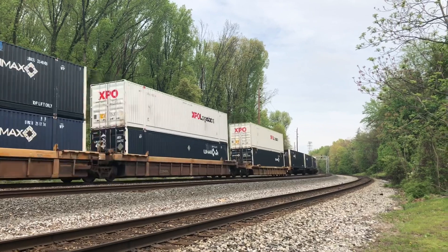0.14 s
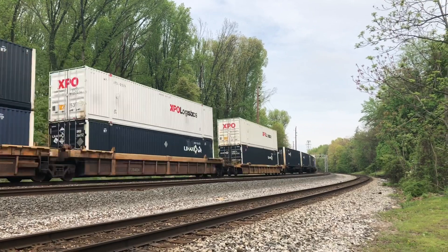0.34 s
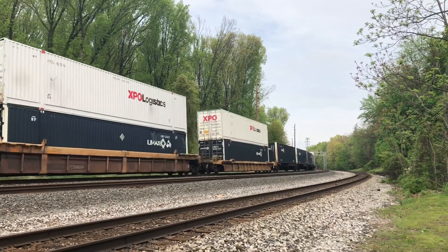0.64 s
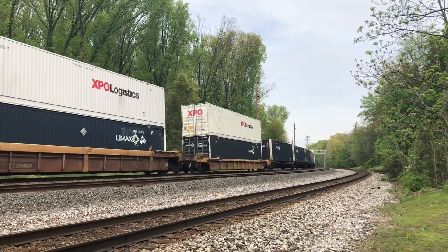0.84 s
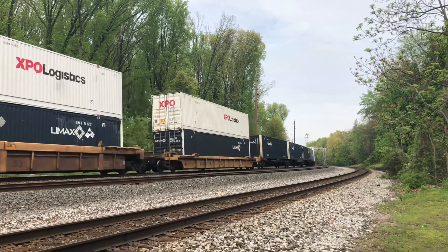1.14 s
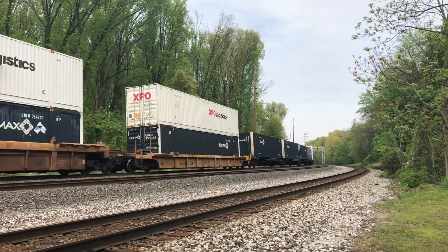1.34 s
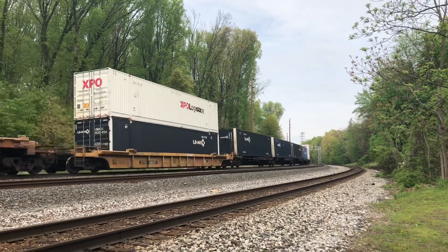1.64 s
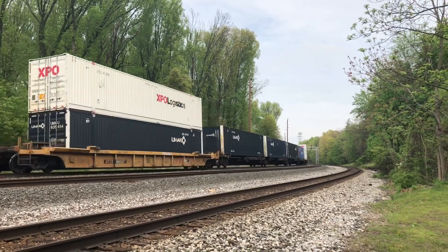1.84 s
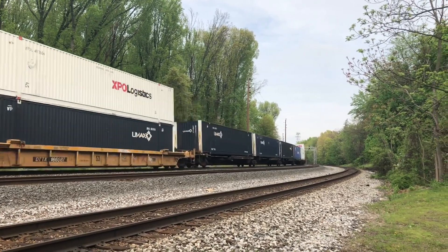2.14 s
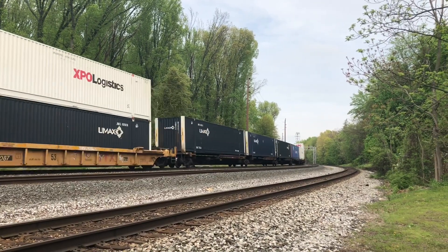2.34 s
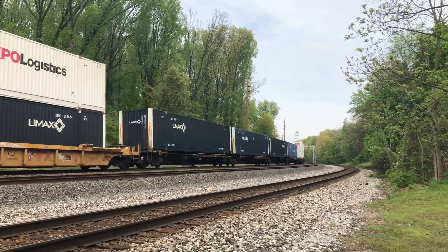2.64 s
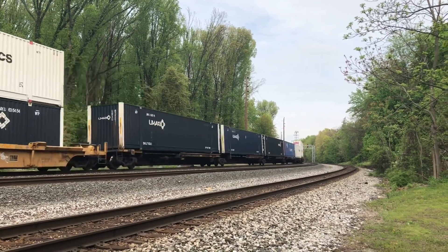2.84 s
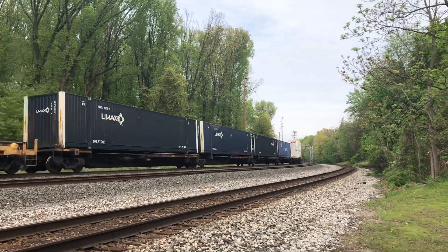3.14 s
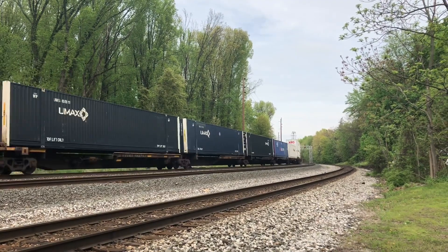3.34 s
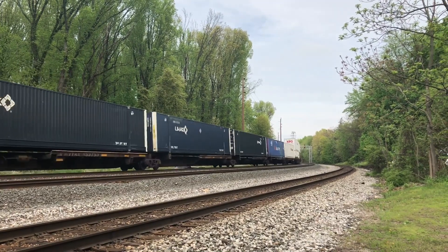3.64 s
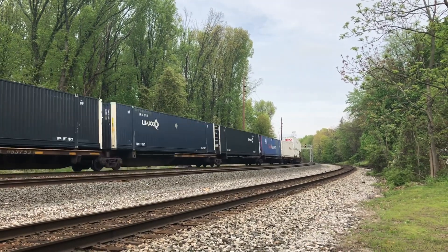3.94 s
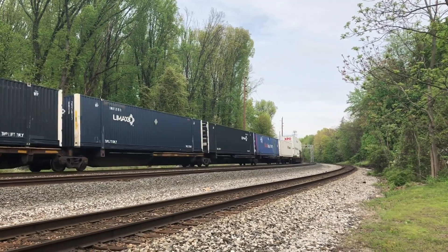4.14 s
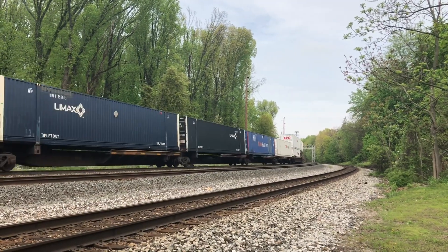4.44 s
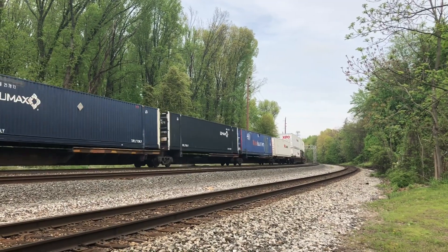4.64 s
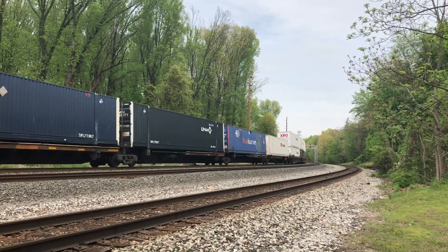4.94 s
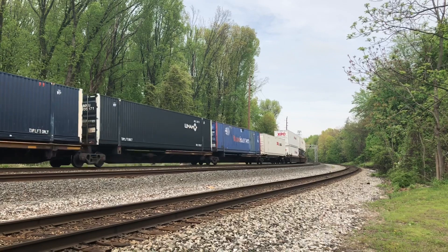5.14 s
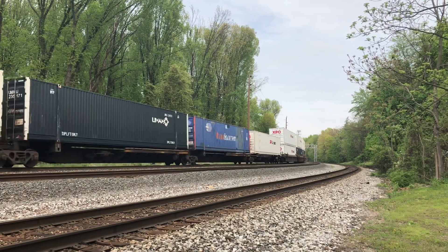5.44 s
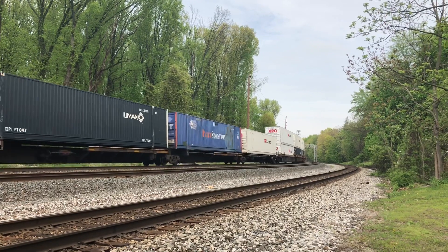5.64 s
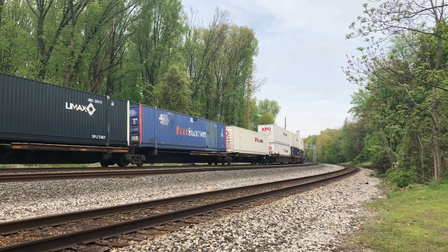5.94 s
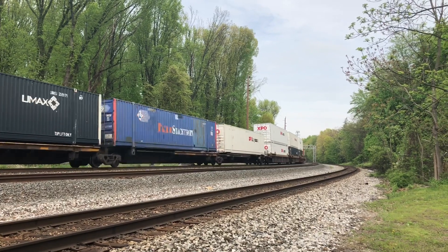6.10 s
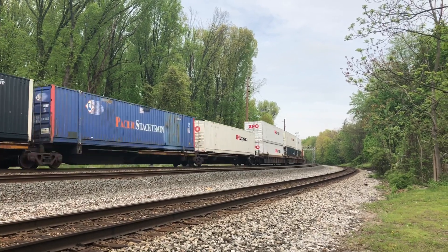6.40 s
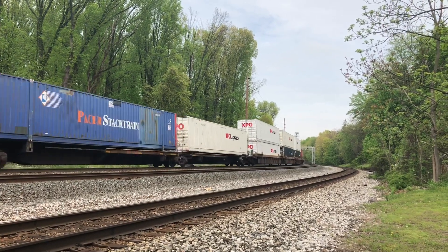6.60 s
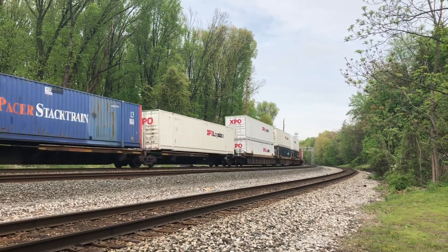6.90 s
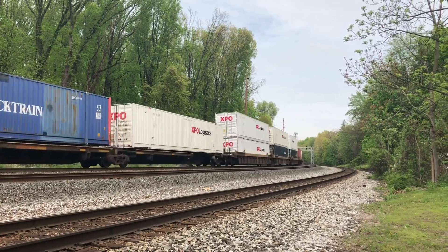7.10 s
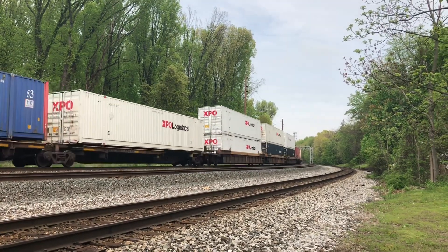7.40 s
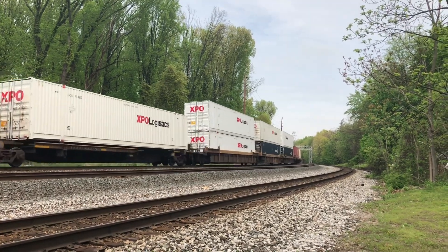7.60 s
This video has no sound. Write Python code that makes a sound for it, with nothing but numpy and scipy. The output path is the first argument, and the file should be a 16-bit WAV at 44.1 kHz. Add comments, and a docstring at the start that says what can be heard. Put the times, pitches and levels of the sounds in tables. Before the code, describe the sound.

A container train rolls round a bend close by, its wheels shrieking in piercing, sinking metallic squeals over harsh grinding, low boom and steady rumble.

```python
"""Wheel squeals, sinking in pitch as each wheel passes, over flange grinding, boom and rail roar.
A container train rolls round a curve some 14 m away, heard in mono from beside the track.
Grinding is Doppler-shifted noise that rings wheel modes; squeals are single modes in stick-slip.
Trees along the line add a noisy halo to each mode. The rolling layers are coloured noise; frame
thumps are short sine bursts, and loose bogie gear is random taps on damped modes."""
import sys
import numpy as np
from scipy import signal
from scipy.fft import irfft, next_fast_len
from scipy.io import wavfile
from scipy.ndimage import uniform_filter1d, map_coordinates

SR = 44100
rng = np.random.default_rng(int(sys.argv[2]) if len(sys.argv) > 2 else 0)


def output_pcm(signal):
    """Save a mono or channel-first signal as 16-bit PCM at the path in sys.argv[1].

    Samples are clipped to [-1, 1] before scaling.
    """
    pcm = np.clip(np.atleast_2d(signal).T, -1, 1) * 32767
    wavfile.write(sys.argv[1], SR, np.round(pcm).astype(np.int16))


N = 342216
T = np.arange(N) / SR
FREQS = np.fft.rfftfreq(2 * next_fast_len(N // 2 + SR // 4), 1 / SR) + 1e-3  # Hz, offset keeps log finite


def undb(db):
    """Decibels to gain."""
    return 10 ** (np.asarray(db) / 20)


def colour(rows):
    """Gain at FREQS from (f/Hz, density/dB) rows, interpolated over log frequency."""
    hz, db = np.transpose(rows)
    return undb(np.interp(np.log(FREQS), np.log(hz), db))


def noise(gain):
    """Random-phase noise of rms 1 with the given spectrum, a little longer than the scene."""
    x = irfft(gain * np.exp(2j * np.pi * rng.random(len(gain))))
    return x / x.std()


def wander(hz, t=T):
    """Smooth random signal of spread about 1 that moves about hz times a second."""
    points = int((t[-1] - t[0]) * hz * 2) + 4
    smooth = signal.resample_poly(rng.standard_normal(points), 8, 1)
    return np.interp(t, t[0] + np.arange(len(smooth)) / (hz * 16), smooth)


def flutter(hz, t):
    """Random complex gain, rms about 1: the sum of many paths."""
    return (wander(hz, t) + 1j * wander(hz, t)) / np.sqrt(2)


# distant rest of the train: f/Hz, density/dB
FAR_SPECTRUM = [(900, -41), (1400, 2.5), (2000, 1), (3000, -0.5), (4400, 1), (6000, -4.5), (8500, -12),
                (11000, -8), (13500, -19), (14600, -4), (15500, -20)]


def far_hiss(level_db=-33):
    """The far wagons blur into a hiss of slowly wandering level."""
    return noise(colour(FAR_SPECTRUM))[:N] * undb(level_db + 2.0 * wander(3))


# wagons changing the rolling noise: t/s, half length to 1/e /s, boom rise/dB, drone rise/dB, roar rise/dB
WAGON_RISES = [(0, .4, .5, 2, -1.3), (1.0, .5, 2.5, 8.5, .6), (2.1, 0.58, -2, 10.5, 0.2),
               (2.85, 0.14, 0.5, 10, -1), (3.25, 0.18, 3, 0, -0.5), (4.903, 1, 3.5, 0, 2.5),
               (6.4, 0.42, 4, 0, .3), (7.5, .5, .8, 0, .8)]


def wagon_rises():
    """Boom, drone and roar rises in dB: a Gaussian bump or dip as each wagon goes by."""
    return sum(np.outer(rises_db, np.exp(-((T - s) / half_s) ** 2))
               for s, half_s, *rises_db in WAGON_RISES)


# wheels on rails: f/Hz, density/dB
ROAR_SPECTRUM = [(76, -39), (130, -9), (162, -2.5), (236, -2), (312, -1.5), (384, -3.5), (503, -5.5),
                 (544, -4.5), (658, -6.5), (895, -8), (1080, -8), (1400, -13.5), (1820, -17.5),
                 (3080, -120)]


def rail_roar(rise_db, level_db=-33):
    """Wheels on rails roar as broadband noise of unsteady level."""
    return noise(colour(ROAR_SPECTRUM))[:N] * undb(level_db + rise_db + 0.92 * wander(8))


# hollow wagon bodies: f/Hz, density/dB
DRONE_SPECTRUM = [(90, -36), (135, -0.5), (175, -9), (215, 0.5), (260, -23), (500, -70)]


def body_drone(rise_db, level_db=-46):
    """Hollow wagon bodies drone in low noise bands."""
    return noise(colour(DRONE_SPECTRUM))[:N] * undb(level_db + rise_db)


# wagon boom: f/Hz, density/dB
BOOM_SPECTRUM = [(13, -54), (22, -34), (61, -3.5), (75, 3), (92, 3), (129, -8.5), (170, -16.5), (220, -32),
                 (370, -120)]


def wagon_boom(rise_db, level_db=-32.5, turn_hz=4.6, throb=0.17):
    """Wagons boom in the bass and throb with each turn of the wheels."""
    turn = np.cos(2 * np.pi * turn_hz * T + wander(0.98))
    boom = noise(colour(BOOM_SPECTRUM))[:N]
    boom /= np.sqrt(uniform_filter1d(boom ** 2, SR // 6))  # the load keeps the boom even
    return boom * (1 + throb * turn) * undb(level_db + rise_db)


# loose bogie gear: f/Hz, level/dB relative
GEAR_MODES = [(335, -4), (660, -3), (770, -5), (850, 5.5), (925, 0), (1060, -8)]


def gear_rattle(centre_s=5.34, half_length_s=0.9, level_db=-39, taps_per_s=45, ring_s=0.021):
    """Loose gear on one passing bogie: random taps ring damped modes."""
    taps = (rng.random(N) < taps_per_s / SR) * rng.standard_normal(N)
    t = T[:SR // 8]
    modes = sum(undb(db) * np.sin(2 * np.pi * hz * t) for hz, db in GEAR_MODES)
    rattle = signal.fftconvolve(taps, modes * np.exp(-t / ring_s))[:N]
    passing = np.exp(-((T - centre_s) / half_length_s) ** 2)
    return rattle / rattle.std() * undb(level_db) * passing


# wagon frame thumps: t/s, level/dB
FRAME_THUMPS = [(4.16, -23), (4.29, -22), (4.79, -23), (5.77, -24), (6.4, -24), (6.49, -24)]


def frame_thumps(thump_hz=80, half_length_s=0.028):
    """Wheel sets thump the wagon frames: short sine bursts of random phase."""
    out = np.zeros(N)
    for s, db in FRAME_THUMPS:
        push = np.exp(-((T - s) / half_length_s) ** 2)  # the heavy frame takes a few cycles to answer
        out += undb(db) * push * np.sqrt(2) * np.sin(2 * np.pi * (thump_hz * T + rng.random()))
    return out


SPEED_M_S, TRACK_M, SOUND_M_S = 15, 14, 343
# moment each wheel is nearest: wheel -> t/s
NEAREST_S = {"A": .25, "B": 2.85, "C": 5.2, "D": 6.45, "E": 6.5, "F": 8.6}


def passage(wheel, t):
    """Distance relative to the nearest point, and when the arriving sound left (s, less the nearest delay)."""
    metres = np.hypot(SPEED_M_S * (t - NEAREST_S[wheel]), TRACK_M)
    return metres / TRACK_M, t - (metres - TRACK_M) / SOUND_M_S


def squeal(wheel, hz, gain, halo_db, flicker_db, rough=0.41, flutter_hz=26,
           halo_width=.014, halo_follow=.65, halo_s=0.075, far_power=1.5):
    """One mode in stick-slip: a Doppler-shifted line, and its echo from trees that each hear another shift."""
    out = np.zeros(N)
    live = np.flatnonzero(gain > gain.max() / 100)
    span = slice(live[0], live[-1] + SR // 4)
    t = T[span]
    distance, sent = passage(wheel, t)

    swing = gain[span] * undb(flicker_db * np.tanh(wander(7, t)))  # the grip comes and goes
    scatter = rough * distance  # the further the wheel, the more the ground breaks up its line
    path = (1 + scatter * flutter(flutter_hz, t)) / np.hypot(1, scatter)
    line = swing * path * np.exp(2j * np.pi * hz * sent)

    keep = np.exp(-1 / (halo_s * SR))
    lingering = np.sqrt(signal.lfilter([1 - keep], [1, -keep], swing ** 2 + 1e-18))
    spread_hz = 60 + halo_width * min(hz, 9000)
    halo_time = t + halo_follow * (sent - t)  # part of the Doppler shift
    phase = 2 * np.pi * hz * halo_time + .7 * wander(spread_hz, t)  # a band with soft skirts
    halo = lingering * flutter(spread_hz, t) * np.exp(1j * phase)

    wet = undb(halo_db) * distance ** far_power  # far wheels are heard mostly by their echo
    out[span] = np.sqrt(2) * (line + wet * halo).real / np.hypot(1, wet)
    return out


def swell(start_s, end_s, growth_db_per_s, decay_db_per_s):
    """Gain with steady dB slopes, 1 from start to end."""
    before_s, after_s = np.maximum(start_s - T, 0), np.maximum(T - end_s, 0)
    return undb(-growth_db_per_s * before_s - decay_db_per_s * after_s)


def burst(s, length_s):
    """Bump of height 1 that rises quickly, holds, and lets go."""
    return np.exp(-(np.sqrt(2) * (T - s) / length_s) ** 4)


BITE_DB_PER_S, SLACKEN_DB_PER_S, GRIND_FALLOFF = 380, 66, 1.35  # falloff: power of distance
# flange contacts: wheel, start/s, end/s, relative level/dB at the nearest point
FLANGE_CONTACTS = [("A", 0, .02, -16.5), ("A", 0.115, 0.49, -19), ("A", .5, 1.55, -20.5),
                   ("B", 1.6, 2.425, -20.5), ("B", 2.2, 2.3, -19.5), ("B", 2.45, 2.66, -23),
                   ("B", 2.7, 3.2, -28), ("B", 3.25, 3.72, -26), ("C", 3.81, 3.81, -17),
                   ("C", 3.9, 4.05, -23), ("C", 4.06, 4.9, -19.5), ("C", 5.0, 5.07, -19),
                   ("C", 5.1, 5.55, -21.5), ("C", 5.6, 6.27, -24), ("E", 6.36, 6.72, -22.5),
                   ("E", 6.75, 6.92, -24.5), ("E", 6.95, 7.22, -27), ("E", 7.3, 7.65, -35.5),
                   ("E", 7.72, 8.5, -28)]


def flange_force(wheel):
    """Grinding strength: the flange bites fast, holds, slackens; firmest contact, weakened by distance."""
    contacts = [undb(db) * swell(start_s, end_s, BITE_DB_PER_S, SLACKEN_DB_PER_S)
                for name, start_s, end_s, db in FLANGE_CONTACTS if name == wheel]
    return np.max(contacts, axis=0) / passage(wheel, T)[0] ** GRIND_FALLOFF


# flange grinding: f/Hz, then density/dB for wheels A, B, C, E
GRIND_SPECTRA = [(1180, -18.5, -47, -9.5, -14), (1880, -6.5, -4, -8.5, -16), (2280, -6.5, -13.5, -11.5, -8),
                 (3630, -7.5, -7, -10, -7), (4270, -2, -4.5, -4, -2), (5900, -5.5, -3, -1, -3.5),
                 (8200, -8, -2, -3, -3.5), (10600, -7.5, -2, -2.5, -3.5), (12900, -10.5, -2, -7.5, -7.5),
                 (15600, -13, -5, -4.5, -8)]
# modes rung by grinding: wheel -> f/Hz at rest, relative level/dB over the grinding spectrum
RUNG_MODES = {"A": [(1550, 11), (1873, 13.5), (2142, 12.5), (3143, 5), (3208, 19), (3875, 17), (4425, 10),
              (4855, 1), (4952, 17.5), (5824, 15), (7579, 5), (8376, 11), (8484, 20), (9259, 18.5),
              (10626, 18), (10777, 2), (11487, 15), (11907, -2), (12801, 7), (13738, 13)], "B": [(4360, 15),
              (5404, 8), (6276, 7), (6438, 12), (6524, 15), (7116, 11), (7719, 8), (8096, 12), (8204, 12),
              (8699, 16), (9011, 16), (9646, -2), (9722, 17.5), (10206, 17), (10809, 19), (11423, 17),
              (12629, 3), (12833, 6), (13156, 9), (13727, 8), (14416, 8), (14836, 10)], "C": [(4705, 20.5),
              (4844, 7), (8354, 7), (9549, -12), (9808, -6), (12919, 3), (13006, 1), (13684, 8)],
              "E": [(3380, 6), (3886, 1), (5286, -2), (6190, -5), (6556, 8), (6998, 11), (7547, -2),
              (7956, 15.5), (8064, 11), (8354, 9), (8548, 1), (9000, 17), (11025, 13), (11983, 4)]}


def grinding(wheel, column, level_db, ring_db, ripple_db, spots=2):
    """The flange scrapes in uneven slips and rings the wheel; the whole spectrum slides with Doppler."""
    force = flange_force(wheel)
    shape = colour(np.array(GRIND_SPECTRA)[:, [0, column]])
    low_cut = 1 / (1 + (1100 / FREQS) ** 4)  # a wheel radiates little below its first modes
    weak_hz = np.arange(0, SR / 2, 40)
    contact = wander(4)  # the contact slides between spots that each favour other weak modes
    scrape = 0
    for spot in range(spots):
        ripple = np.interp(FREQS, weak_hz, rng.standard_normal(len(weak_hz)))
        spot_noise = noise(shape * low_cut * undb(ripple_db * ripple))[:N]
        scrape += spot_noise * np.cos(contact + np.pi * (spot + .5) / spots)

    # Doppler: read the 2x oversampled scrape at its sending times
    read_at = 2 * SR * passage(wheel, T)[1]
    heard = map_coordinates(signal.resample_poly(scrape, 2, 1), [read_at], order=3, mode="mirror")
    judder = undb(1.1 * wander(32))
    out = heard / heard.std() * force * judder * undb(level_db)

    drive = force ** 2 / force.max()  # strong modes ring out only under hard grinding
    for hz, db in RUNG_MODES[wheel]:
        gain = drive * np.interp(hz, FREQS, shape) * undb(db + ring_db)
        out += squeal(wheel, hz, gain, halo_db=-4.0, flicker_db=9.5)
    return out


# single squeals: wheel, f/Hz at rest, loudest t/s, length/s, level/dB
SINGLE_SQUEALS = [("A", 4338, .17, .12, -17.5), ("A", 4425, .25, .5, -26), ("A", 5824, .35, .4, -29),
                  ("A", 4352, .38, .24, -25), ("A", 3725, .45, .14, -21), ("A", 5071, .5, .2, -24),
                  ("C", 4085, 1.25, .4, -32), ("C", 6420, 1.52, .35, -28), ("A", 8520, 1.55, .26, -30),
                  ("B", 8311, 1.95, .25, -31), ("C", 4780, 2.22, .1, -30), ("B", 9722, 2.29, .16, -23),
                  ("B", 8311, 2.3, .18, -19), ("B", 4360, 2.38, .08, -32), ("B", 4360, 2.6, .18, -33),
                  ("B", 4050, 3.08, .25, -41), ("C", 6135, 3.83, .06, -30), ("C", 8035, 3.83, .06, -28),
                  ("F", 2690, 4.0, 1.8, -43), ("F", 1935, 4.1, 1.6, -37), ("C", 7425, 4.42, .14, -21),
                  ("C", 11315, 4.6, .8, -29), ("C", 10508, 4.68, .42, -23), ("C", 8354, 4.91, .14, -25),
                  ("C", 6395, 4.97, .22, -26), ("C", 7400, 5.19, .15, -22), ("C", 5900, 5.33, .05, -27),
                  ("C", 6020, 5.3, .5, -30), ("B", 8690, 6.4, 1.2, -30), ("E", 9065, 6.49, .24, -23),
                  ("E", 6190, 6.64, .12, -26), ("E", 8548, 6.665, .06, -17), ("B", 1950, 6.8, 1.2, -42),
                  ("B", 4380, 7.0, .7, -39), ("F", 4960, 7.75, .05, -28), ("F", 6710, 7.75, .05, -26),
                  ("F", 9830, 7.75, .06, -30)]


def single_squeals():
    """From brief chirps to far squeals of a second or more: each mode locks, holds and lets go."""
    return sum(squeal(wheel, hz, undb(db) * burst(s, length_s), halo_db=-7.0, flicker_db=5.5)
               for wheel, hz, s, length_s, db in SINGLE_SQUEALS)


# surging squeals: mode, full from/s, until/s, growth/(dB/s), decay/(dB/s), level/dB before surges
SURGING_SQUEALS = [("howl", .02, .7, 200, 19, -28), ("howl", 0.54, .59, 77, 90, -12),
                   ("howl", 1.05, 1.12, 200, 200, -26.5), ("shriek", 0, 0.66, 200, 20, -22.5),
                   ("whistle", .15, 0.65, 41, 19, -23), ("whistle", .9, 1.11, 30, 60, -27.5),
                   ("sizzle", 2.28, 2.45, 25, 15, -24), ("sing", .9, 3.96, 50, 20, -36.5),
                   ("sing", 4.7, 5.1, 11.6, 190, -24), ("screech", 2.2, 3.7, 9.8, 70, -32.5),
                   ("screech", 4.285, 4.705, 46, 39, -16.5), ("screech", 5.1, 5.7, 65, 18, -24.5),
                   ("needle", 5.5, 6.27, 20, 24, -18.5), ("needle", 6.9, 7.4, 30, 15, -32),
                   ("keen", 6.4, 7.22, 330, 100, -20.5)]
# flange presses harder or eases: mode, t/s, length/s, change/dB
PRESSURE_SURGES = [("shriek", .01, 0.044, 5.6), ("whistle", 0.294, 0.096, 6.4), ("shriek", .3, 0.14, 5.7),
                   ("shriek", 0.687, 0.047, 6), ("shriek", 1.16, .07, 8), ("sizzle", 2.28, .05, 7),
                   ("sizzle", 2.39, 0.048, 7), ("screech", 3.43, 0.39, 5.3), ("screech", 4.73, .07, 4),
                   ("screech", 4.98, .07, -6), ("sing", 4.44, 0.063, 5.8), ("sing", 4.74, 0.11, 6),
                   ("sing", 5.0, .06, -7), ("screech", 5.56, .1, 5.2), ("needle", 5.57, 0.11, 7.5),
                   ("needle", 5.84, 0.075, -3), ("needle", 5.95, 0.053, 10), ("needle", 6.075, .075, 12),
                   ("needle", 6.19, 0.07, 4), ("keen", 6.595, 0.066, 9), ("keen", 6.74, .08, 8.3),
                   ("keen", 6.97, 0.052, 6.6), ("keen", 7.15, 0.083, 4)]


def squeal_strength(mode):
    """A locked mode builds, holds and dies; most surge with the pressure on the flange."""
    held = [undb(db) * swell(start_s, end_s, growth, decay)
            for name, start_s, end_s, growth, decay, db in SURGING_SQUEALS if name == mode]
    surge_db = sum(db * burst(s, length_s) for name, s, length_s, db in PRESSURE_SURGES if name == mode)
    return np.max(held, axis=0) * undb(surge_db)


# modes locking into surging squeals: mode -> wheel, f/Hz at rest
LOCKED_MODES = {"howl": ("A", 2657), "shriek": ("A", 7493), "whistle": ("A", 10152), "sizzle": ("B", 11832),
                "sing": ("C", 2056), "screech": ("C", 4780), "needle": ("D", 14670), "keen": ("E", 12962)}


def surging_squeals():
    """Wheel modes lock in stick-slip, once or several times, with less flicker than the single squeals."""
    return sum(squeal(wheel, hz, squeal_strength(mode), halo_db=-9, flicker_db=2.5, rough=0.35)
               for mode, (wheel, hz) in LOCKED_MODES.items())


def scene():
    """Rolling noise, knocks, grinding flanges and squeals, alike in both channels."""
    boom_rise_db, drone_rise_db, roar_rise_db = wagon_rises()
    out = far_hiss() + rail_roar(roar_rise_db) + body_drone(drone_rise_db) + wagon_boom(boom_rise_db)
    out += gear_rattle() + frame_thumps()
    out += grinding("A", column=1, level_db=3.5, ring_db=-22.5, ripple_db=6.0)
    out += grinding("B", column=2, level_db=2, ring_db=-24, ripple_db=7.0)
    out += grinding("C", column=3, level_db=3.5, ring_db=-23.5, ripple_db=5)
    out += grinding("E", column=4, level_db=5, ring_db=-22.0, ripple_db=6.0)
    out += single_squeals() + surging_squeals()
    return np.array([out, out])


TOP_HZ = 15750


def record(dry):
    """The recorder clips at full scale, then a steep low-pass cuts the top."""
    low_pass = signal.ellip(12, .1, 80, TOP_HZ, fs=SR, output="sos")
    return signal.sosfilt(low_pass, np.clip(dry, -1, 1))


dry = scene()
out = record(dry)
output_pcm(out)
```